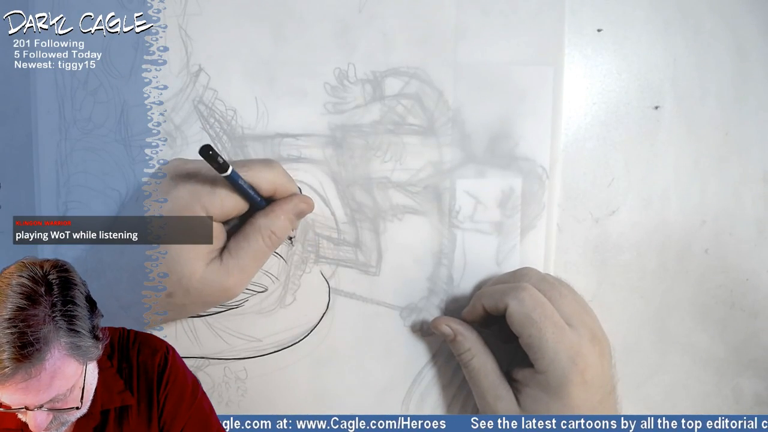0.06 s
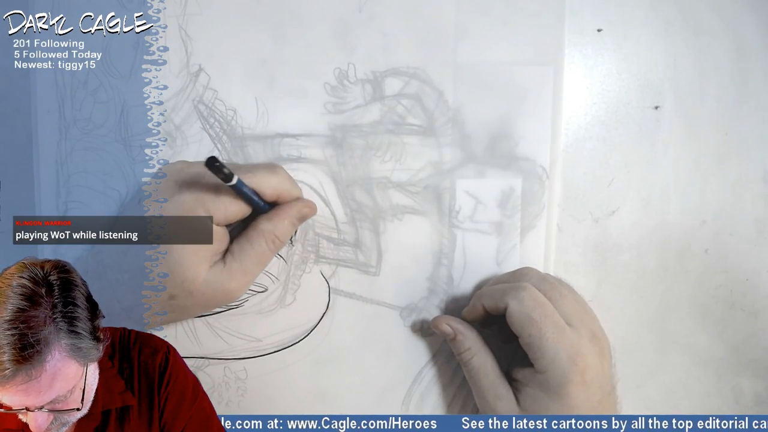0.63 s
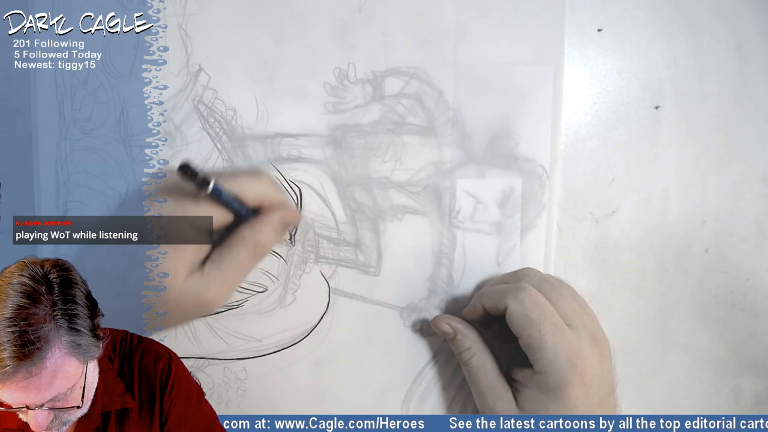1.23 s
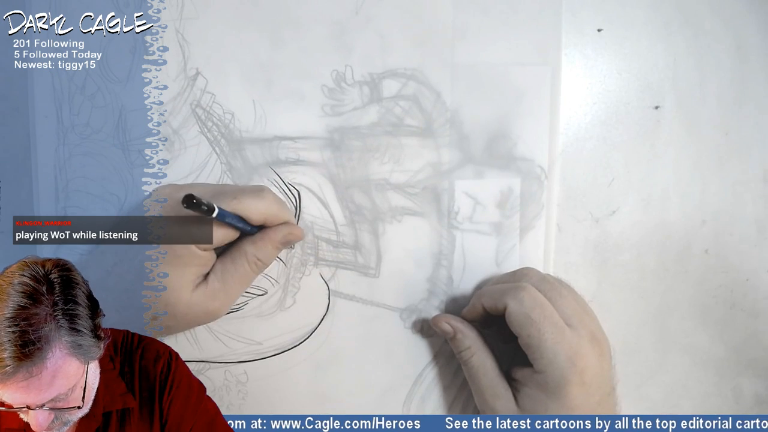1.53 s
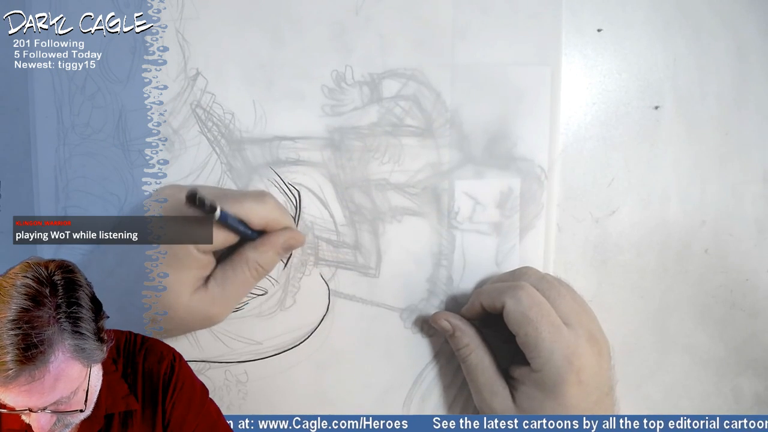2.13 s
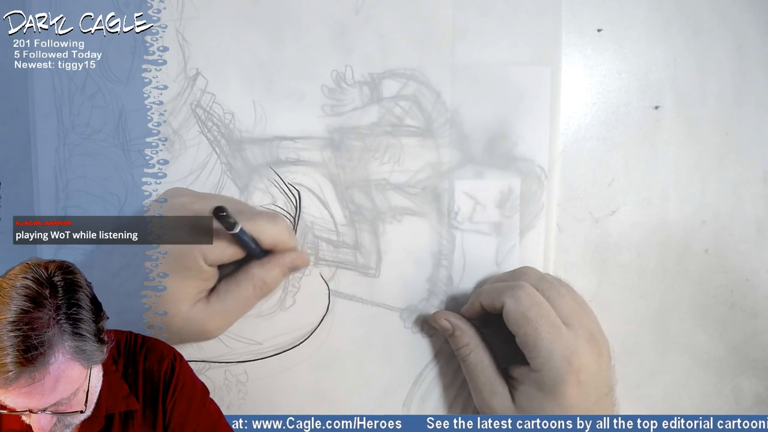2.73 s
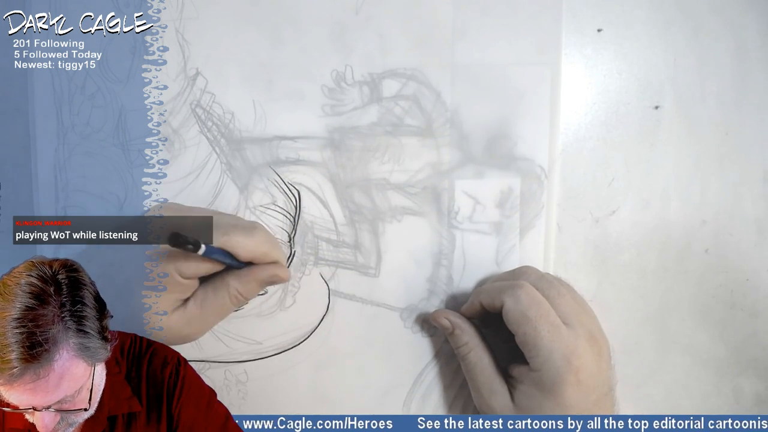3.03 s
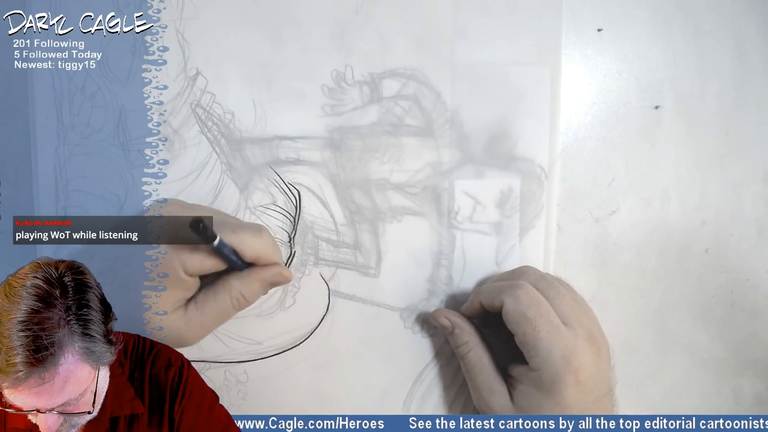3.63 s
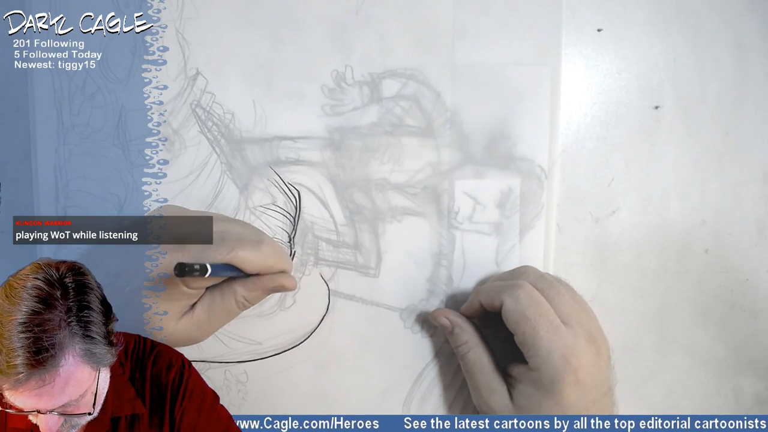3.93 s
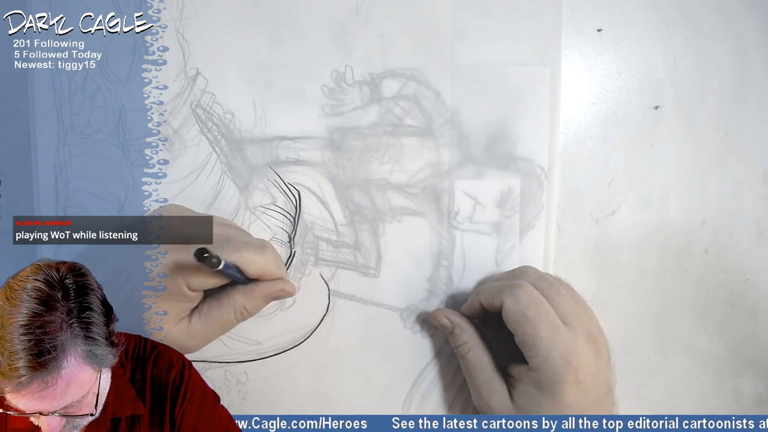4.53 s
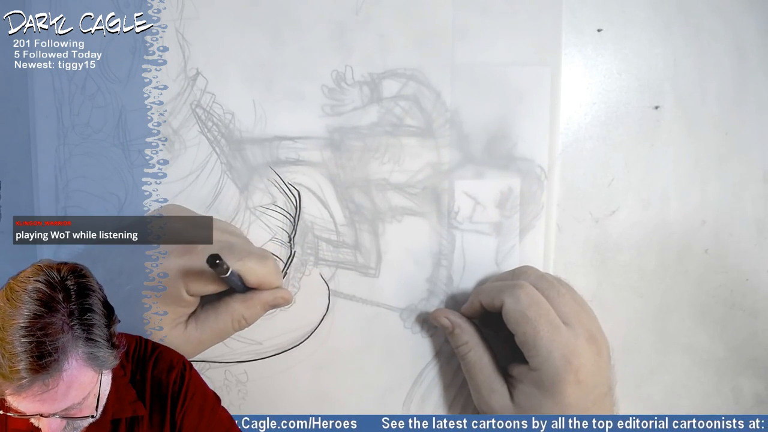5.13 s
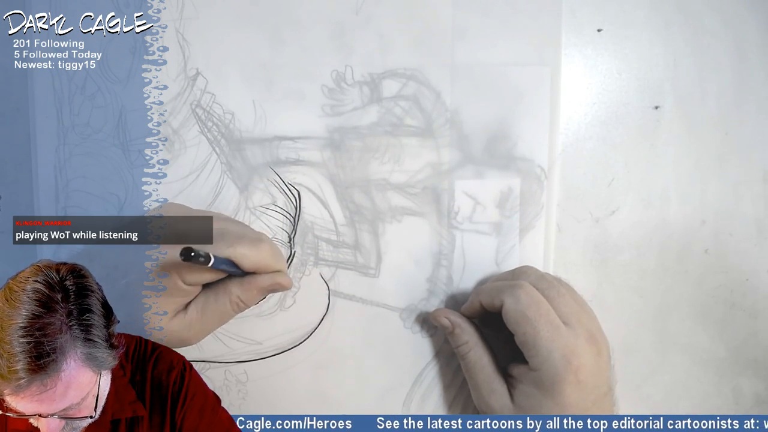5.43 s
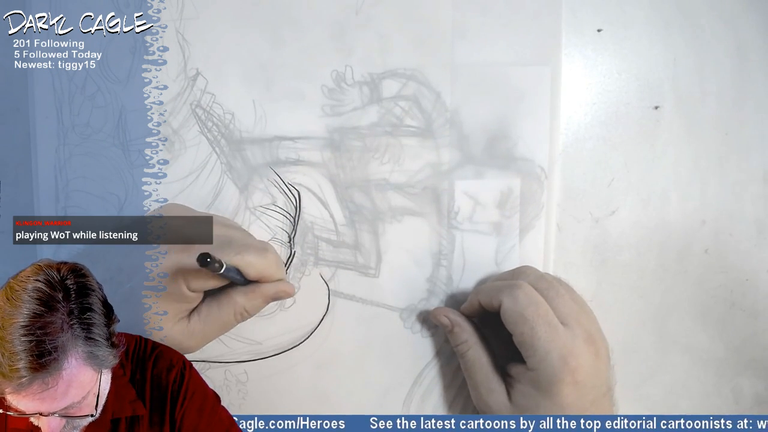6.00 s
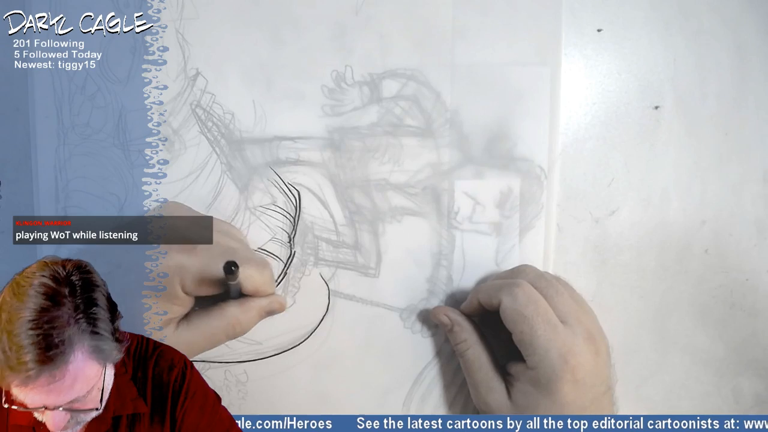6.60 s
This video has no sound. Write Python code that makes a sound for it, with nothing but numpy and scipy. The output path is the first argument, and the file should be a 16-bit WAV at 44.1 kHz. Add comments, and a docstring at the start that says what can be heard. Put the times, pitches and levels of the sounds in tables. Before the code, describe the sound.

An ink pen scratches short, irregular strokes on paper, close to the microphone in a small room. Partway through, a hand taps lightly on the drawing board and brushes the sheet, and the desk gives a deep rumble. The strokes go on, some quick and bright. A computer hums and its fan hisses softly behind, and the whole sound fades and briefly drops out several times.

```python
"""An ink pen hatches short strokes on a sheet of paper lying on a drawing board.
The nib rasps over the fibres and rings board, barrel and nib; the faster the flick, the brighter it is.
The hand knocks and slides on the sheet, and the arm's weight shakes the desk with a deep rumble.
Behind it a computer hums and its fan hisses. In places the whole sound sinks and briefly drops out."""
import sys
import numpy as np
from scipy import signal
from scipy.fft import rfft, irfft, next_fast_len
from scipy.io import wavfile
from scipy.ndimage import uniform_filter1d

SR = 44100
rng = np.random.default_rng(int(sys.argv[2]) if len(sys.argv) > 2 else 0)


def to_wav(s):
    """Save 16-bit WAV."""
    ch = np.atleast_2d(s).T  # columns
    pcm = np.round(np.clip(ch, -1, 1) * 32767)  # PCM
    wavfile.write(sys.argv[1], SR, pcm.astype(np.int16))


N = 298116
TIME = np.arange(N) / SR


# the pen tips over as the hatching moves down the sheet: t/s, lean/0-1
PEN_LEAN = [(1.3, 0.03), (1.8, 0.38), (3.7, 0.4), (4.7, 1)]
# resonances of board, barrel, nib and tines: f/Hz, width/Hz, upright level/dB, leaning level/dB
BOARD_BODY = [(815, 53, -11, -24), (1154, 55, -2, -15), (1302, 23, 0.5, -9), (1405, 31, 4, -2.5),
              (1545, 33, -1, -2.5), (1630, 21, -24, -5.5), (1702, 34, -13, 0), (1817, 33, 2, 2.5),
              (2094, 59, -2.5, -5)]
BARREL_RASP = [(2308, 44, 3.5, -2.5), (2420, 78, 3.5, -3.5), (2470, 33, 7.5, -17.5), (2663, 120, 1.5, -0.5),
               (3230, 270, -7, -9), (3470, 37, -9.5, 1), (3586, 230, -7.5, 0), (4490, 230, -4, -1.5),
               (5040, 220, -8.5, -3), (5960, 630, -15.5, -10)]
NIB_SIZZLE = [(7470, 1400, 9.5, 8), (8030, 450, 18.5, -6.5), (9440, 250, -11.5, -13.5), (9840, 280, 0, 12),
              (10500, 2600, -10, -19), (12320, 810, -7, 0), (14300, 350, -7.5, 3),
              (15000, 1500, -5.5, -11.5)]
TINE_SHIMMER = [(8710, 800, -2, -1.5), (12940, 800, -3, -6), (15300, 910, -6.5, -7.5)]
def pen(lean_rasp_db=-1, lean_sizzle_db=1.7, flex_db=-17, flex_hz=140, flex_width_hz=100):
    """Friction rings board and pen; a leaning pen rasps less and sizzles more."""
    body, rasp, sizzle, shimmer, focus = stroke_envelopes()
    lean = np.interp(TIME, *np.transpose(PEN_LEAN))
    force = friction()
    flex = resonate(force, flex_hz, flex_width_hz)   # the whole board gives a little
    flex = rms_one(resonate(flex, flex_hz, flex_width_hz))
    main_ring = rms_one(resonate(rng.standard_normal(N), hz=1399, width_hz=65))
    return (rub(force * body * np.sqrt(1 - focus), BOARD_BODY, lean, low_cut_hz=290)
            + rub(force * rasp * from_db(lean_rasp_db * lean), BARREL_RASP, lean, low_cut_hz=850)
            + rub(force * sizzle * from_db(lean_sizzle_db * lean), NIB_SIZZLE, lean, low_cut_hz=6700)
            + rub(force * shimmer, TINE_SHIMMER, lean, low_cut_hz=8500)
            + body * (np.sqrt(focus) * main_ring + from_db(flex_db) * flex))


# pen strokes: t/s, rise to top speed/s, length/s, pressure level/dB, top speed/dB re a sharp flick
HATCHING = [ (0.236, 0.038, 0.12, -48.5, -9.5), (0.502, 0.037, 0.11, -51, -13),
            (0.71, 0.03, 0.062, -57.5, -25), (0.75, 0.044, 0.074, -51.5, -8.5),
            (1.423, 0.008, 0.086, -55.5, -16), (1.482, 0.0046, 0.099, -49, -9.5),
            (1.726, 0.033, 0.083, -49, -3.5), (2.268, 0.0069, 0.058, -46, -29),
            (2.284, 0.057, 0.14, -50.5, -3.5), (2.346, 0.013, 0.062, -49, -18),
            (3.213, 0.052, 0.098, -59.5, 0), (3.722, 0.1, 0.31, -59, -0.5),
            (4.393, 0.04, 0.114, -50.5, -11), (4.568, 0.019, 0.063, -60.5, -12),
            (4.706, 0.023, 0.095, -50.5, -11), (4.85, 0.011, 0.067, -52, -37),
            (5.013, 0.01, 0.077, -50, -11.5), (5.589, 0.066, 0.059, -69, -8),
            (5.862, 0.014, 0.071, -50, -7.5), (6.338, 0.022, 0.08, -52, -10), (6.703, 0.065, 0.09, -67, -1)]
def stroke_envelopes(attack_s=0.0025, lift_s=0.028, landing_speed=0.4, settle_s=0.033, slow_focus=0.56):
    """Board, rasp and sizzle all sound from first touch and swell with the stroke's speed."""
    body, rasp, sizzle, shimmer, focus = np.zeros((5, N))
    for touch, rise, length, press_db, speed_db in HATCHING:
        rasp_db = press_db + 0.6 + 0.84 * speed_db
        sizzle_db = press_db - 4 + 1.03 * speed_db
        shimmer_db = sizzle_db + 5 + speed_db   # only the fastest flicks set the tines singing
        speed = swing(touch, rise, length)
        on = speed > 0
        age = TIME[on] - touch
        contact = np.clip(age / attack_s, 0, 1) * np.clip((length - age) / lift_s, 0, 1)
        bite = landing_speed * np.exp(-age / settle_s)   # the nib lands already moving
        speed = np.maximum(speed[on], bite)
        body[on] = np.hypot(body[on], from_db(press_db) * contact * speed ** 0.46)
        rasp[on] = np.hypot(rasp[on], from_db(rasp_db) * np.sqrt(contact) * speed ** 0.78)
        sizzle[on] = np.hypot(sizzle[on], from_db(sizzle_db) * np.sqrt(contact) * speed ** 0.51)
        shimmer[on] = np.hypot(shimmer[on], from_db(shimmer_db) * contact * speed ** 1.1)
        # a slow stroke puts this share of the board's power into its main ring
        focus[on] = slow_focus * (1 - from_db(speed_db))
    return body, rasp, sizzle, shimmer, focus


def friction(snags_per_s=4000, snag_spread_db=2.5, smooth_gain=0.73, tooth_db=1.06):
    """The nib snags on single fibres over a smooth rub; the paper's tooth makes the force uneven."""
    snags = (rng.random(N) < snags_per_s / SR) * rng.choice([-1, 1], N)
    snag_size = from_db(snag_spread_db * np.minimum(rng.exponential(1, N), 4))
    force = rms_one(snags * snag_size) + smooth_gain * rng.standard_normal(N)
    return rms_one(force * from_db(tooth_db * drift(rate_hz=47)))


def rub(force, modes, lean, low_cut_hz):
    """Force rings a set of modes; the pen's lean crossfades between two equally strong voicings."""
    hz, width, upright_db, leaning_db = np.transpose(modes)
    voicings = from_db([upright_db, leaning_db])
    upright, leaning = (gains / np.sqrt(np.sum(gains ** 2 * width) * np.pi / SR) for gains in voicings)
    out = np.zeros(N)
    for k in range(len(hz)):
        gain = upright[k] + lean * (leaning[k] - upright[k])
        out += (-1) ** k * resonate(force * gain + 1e-18, hz[k], width[k])
    return signal.sosfilt(signal.butter(2, low_cut_hz, "high", fs=SR, output="sos"), out)


# light taps on the board: t/s, level/dB, contact cut-off f/Hz
TAPS = [(1.942, -49, 1500), (2.453, -41, 1500), (2.4583, -44, 2000), (2.8115, -42, 2800),
        (2.853, -37.5, 1200), (2.874, -47, 1200), (2.932, -51, 7000), (5.458, -42.5, 2610)]
# the board's short ring after a tap: f/Hz, level/dB, t60/s
TAP_RING = [(494, -11.5, 0.023), (843, -8, .035), (1167, -1, 0.022), (1316, -2.5, 0.033),
            (1760, -7, 0.0067), (2800, -13, 0.0078)]
def knocks():
    """Pen and knuckles touch the board; a softer contact is a duller click."""
    clicks = np.zeros(N)
    for start, db, contact_hz in TAPS:
        at = round(start * SR)
        softness = np.exp(-2 * np.pi * contact_hz / SR)
        push = (1 - softness) * softness ** np.arange(128)
        clicks[at:at + len(push)] += from_db(db) * push
    return sum((-1) ** k * from_db(db) * ring(clicks, hz, t60)
               for k, (hz, db, t60) in enumerate(TAP_RING))


# the side of the hand slides: t/s, rise to top speed/s, length/s, level/dB
HAND_MOVES = [(1.904, 0.034, 0.18, -64), (2.443, 0.031, 0.087, -59), (2.497, 0.053, 0.11, -63),
              (2.792, 0.051, 0.29, -70)]
# tone of skin on paper: f/Hz, level/dB
SKIN_TONE = [(120, -17), (280, -5.5), (600, 4.5), (900, -5), (1300, 6.5), (2000, -12), (5000, -36.5)]
def hand(flutter_db=0.83):
    """Skin brushes dully over the sheet, swelling with the hand's speed."""
    swell = sum(from_db(db) * swing(start, rise, length) for start, rise, length, db in HAND_MOVES)
    return swell * coloured_noise(SKIN_TONE) * from_db(flutter_db * drift(rate_hz=60))


# the arm shifts its weight: peak t/s, level/dB
ARM_JOLTS = [(1.05, -48), (1.88, -49.5), (2.4, -46.5), (2.79, -28.5), (2.96, -35), (5.1, -48), (5.95, -45),
             (6.63, -46.5)]
# sub-bass tone of the shaking desk: f/Hz, level/dB
DESK_TONE = [(3, -28.5), (12, 3), (24, -5), (34, -9), (46, -11), (60, -24), (100, -43), (200, -45.5),
             (500, -77.5)]
def desk(rise_db_per_s=329, decay_db_per_s=52.5, tremor_db=-54.5, even_s=0.17, trim_db=-1):
    """The arm rocks the desk: each jolt builds and dies away over the tremor of the resting arm."""
    rumble = coloured_noise(DESK_TONE)
    rumble /= np.sqrt(uniform_filter1d(rumble ** 2, int(even_s * SR)) + 1e-9)   # even out its own swells
    power = from_db(tremor_db) ** 2
    for peak, db in ARM_JOLTS:
        below_peak_db = np.maximum(rise_db_per_s * (peak - TIME), decay_db_per_s * (TIME - peak))
        power = power + from_db(db - below_peak_db) ** 2
    return from_db(trim_db) * np.sqrt(power) * rumble


# tone of the fan's rush and hiss: f/Hz, level/dB
AIR_TONE = [(20, 17.5), (100, 7), (200, 2), (330, 3), (500, -2), (750, -3.5), (1000, 1), (1600, -3),
            (2100, -4), (2600, -14), (4700, -10), (6000, -14), (10000, -16), (15500, -17)]
# hollows of the fan housing: f/Hz, width/Hz, level/dB
HOUSING_MODES = [(1108, 40, 5.5), (1307, 150, 2), (1912, 130, -2.5), (2018, 60, -5.5), (3416, 73, -6.5),
                 (4170, 460, -16), (4694, 120, -10.5), (7670, 200, -16.5), (8640, 350, -20.5)]
def fan(air_db=-60, housing_db=-64.5):
    """Rushing air resounds in the computer's housing."""
    hollow = sum(from_db(db) * resonate(rng.standard_normal(N), hz, width)
                 for hz, width, db in HOUSING_MODES)
    return from_db(air_db) * coloured_noise(AIR_TONE) + from_db(housing_db) * rms_one(hollow)


# the computer's drone: f/Hz, level/dB, unsteady share/0-1, waver rate/Hz
HUM_TONES = [(47.1, -68, 1, 6.7), (65.4, -68.5, 0.5, 7.4), (80.3, -61.5, 0.9, 6), (92.3, -59.5, .4, 8.6),
             (133.1, -74, 0.7, 3.6), (160.2, -80.5, 0.9, 12), (273.7, -72.5, 0.69, 7.4)]
def computer_hum(trim_db=0.9, waver_db=1.1):
    """Low tones, each part steady and part wavering, under one slowly drifting level."""
    level = from_db(trim_db + waver_db * drift(rate_hz=1))
    hum = np.zeros(N)
    for hz, db, unsteady, rate_hz in HUM_TONES:
        phase = 2 * np.pi * (hz * TIME + rng.random())
        steady = np.sqrt(2 * (1 - unsteady ** 2)) * np.cos(phase)
        wavering = drift(rate_hz) * np.cos(phase) + drift(rate_hz) * np.sin(phase)
        hum += from_db(db) * (steady + unsteady * wavering)
    return level * hum


def room(send, t60=0.14, wall_cut_hz=4000, first_echo_s=0.0013):
    """The walls of a small study return dense, dull reflections."""
    t = TIME[:SR // 2]
    tail = rng.standard_normal(len(t)) * np.exp(-np.log(1000) * t / t60) * (t > first_echo_s)
    walls = signal.butter(1, wall_cut_hz, fs=SR, output="sos")
    tail = signal.sosfilt(walls, tail / np.linalg.norm(tail))
    return signal.fftconvolve(send, tail)[:N]


# dips in the whole mix: fade start t/s, return t/s
MIX_DIPS = [(-0.14, 0.239), (1.3, 1.42), (3.54, 4.023), (5.345, 5.865), (6.335, 6.588)]
def dropouts(fade_s=0.35, shut_gain=0.076, floor_db=-58, return_s=0.02):
    """The level slides down evenly, snaps shut if it gets low enough, and comes back quickly."""
    gain = np.ones(N)
    for start, back in MIX_DIPS:
        fade = np.clip(1 - (TIME - start) / fade_s, 0, 1)
        fade *= np.clip(fade / shut_gain - 1, 0, 1)
        reopen = np.clip((TIME - back) / return_s, 0, 1)
        gain *= np.maximum(fade, reopen)
    return np.maximum(gain, from_db(floor_db))


def swing(start, rise, length):
    """Speed of one hand movement: up from rest to 1 and back."""
    ramp = np.interp(TIME - start, [0, min(rise, length - 1 / SR), length], [0, 1, 0])
    return np.sin(np.pi / 2 * ramp)


def resonate(x, hz, width_hz):
    """One resonance with gain 1 at its peak."""
    r, w = np.exp(-np.pi * width_hz / SR), 2 * np.pi * hz / SR
    return signal.lfilter(np.array([1, 0, -1]) * (1 - r * r) / 2, [1, -2 * r * np.cos(w), r * r], x)


def ring(clicks, hz, t60):
    """A unit click starts a dying sine of height 1."""
    r, w = np.exp(-np.log(1000) / (t60 * SR)), 2 * np.pi * hz / SR
    return signal.lfilter([0, np.sin(w)], [1, -2 * r * np.cos(w), r * r], clicks + 1e-18)


def coloured_noise(tone):
    """Noise of unit rms shaped by an EQ curve of f/Hz, level/dB."""
    hz, db = np.transpose(tone)
    size = next_fast_len(N)
    bin_hz = np.maximum(np.fft.rfftfreq(size, 1 / SR), 1)
    curve = from_db(np.interp(np.log(bin_hz), np.log(hz), db))
    return rms_one(irfft(rfft(rng.standard_normal(size)) * curve, size)[:N])


def drift(rate_hz, hop=40, run_in=2000):
    """Smooth random modulation of unit rms, rolling off above rate_hz."""
    r = np.exp(-2 * np.pi * rate_hz * hop / SR)
    noise = rng.standard_normal(N // hop + run_in + 2)
    slow = signal.lfilter([1], [1, -2 * r, r * r], noise)[run_in:]
    return np.interp(np.arange(N) / hop, np.arange(len(slow)), rms_one(slow))


def from_db(db):
    """Decibels to gain."""
    return 10 ** (np.asarray(db) / 20)


def rms_one(x):
    """Scale to unit rms."""
    return x / np.sqrt(np.mean(x ** 2) + 1e-30)


def scene(pen_send_db=-10, handling_send_db=-8):
    """Pen and hand up close with a touch of room, over a bed of desk rumble and computer noise; mono."""
    strokes = pen()
    handling = knocks() + hand()
    reverb = room(from_db(pen_send_db) * strokes + from_db(handling_send_db) * handling)
    return (strokes + handling + reverb + desk() + fan() + computer_hum())[None]


def record(dry, high_cut_hz=15700):
    """The mix sinks and drops out in places; a steep filter cuts the very top."""
    high_cut = signal.ellip(12, 0.1, 80, high_cut_hz, fs=SR, output="sos")
    return signal.sosfilt(high_cut, dry * dropouts())


dry = scene()
out = record(dry)
to_wav(out)
```